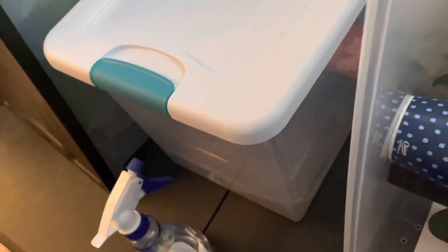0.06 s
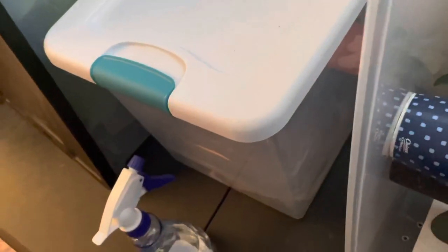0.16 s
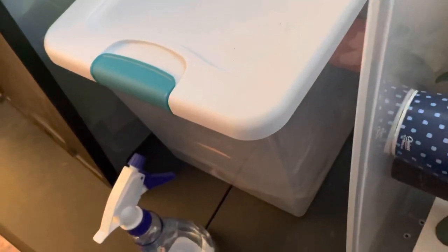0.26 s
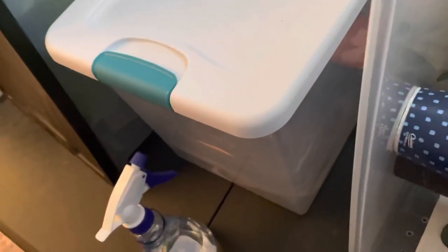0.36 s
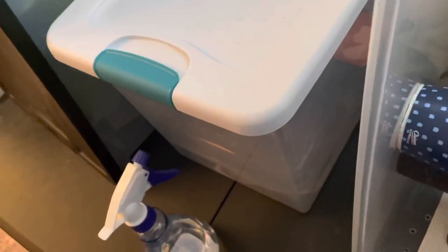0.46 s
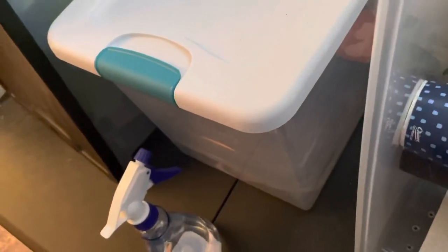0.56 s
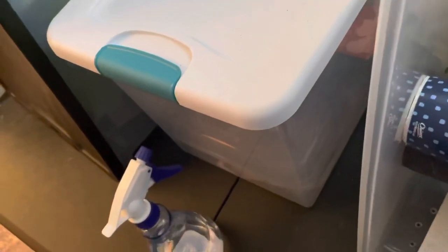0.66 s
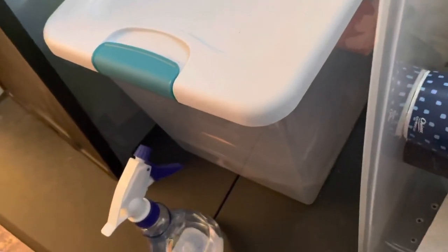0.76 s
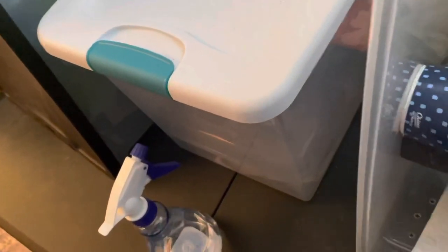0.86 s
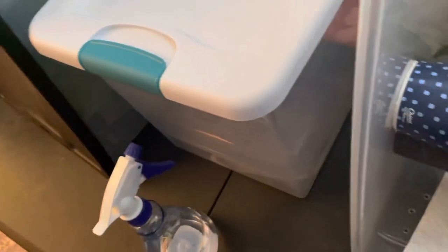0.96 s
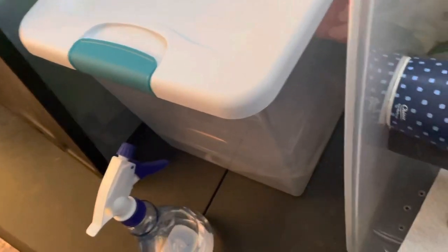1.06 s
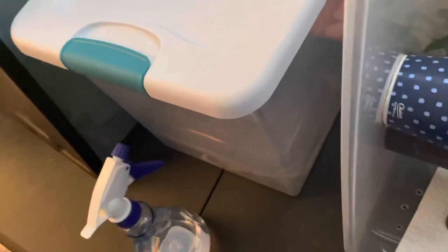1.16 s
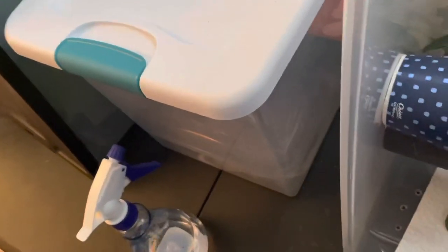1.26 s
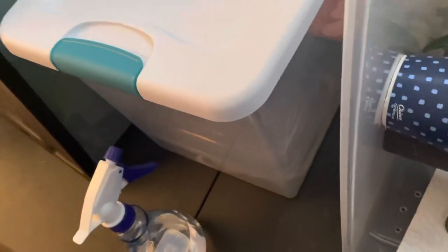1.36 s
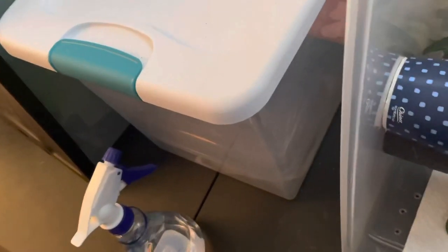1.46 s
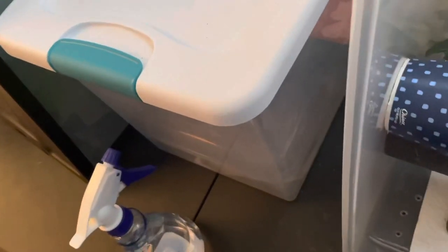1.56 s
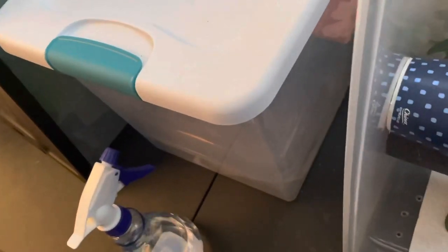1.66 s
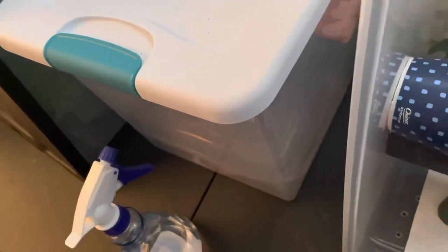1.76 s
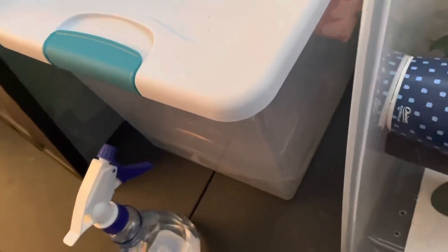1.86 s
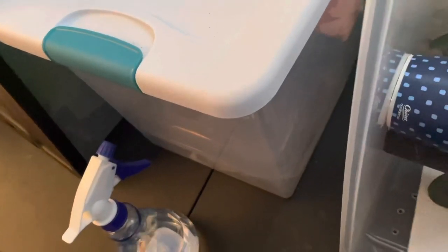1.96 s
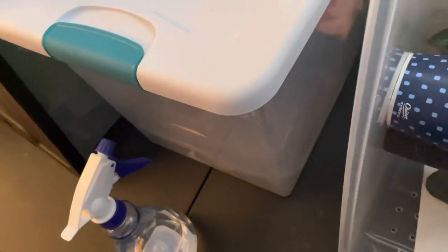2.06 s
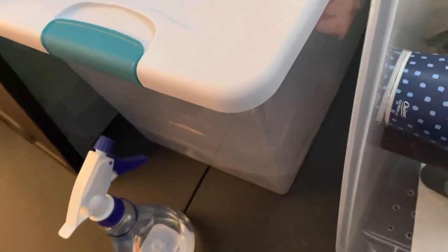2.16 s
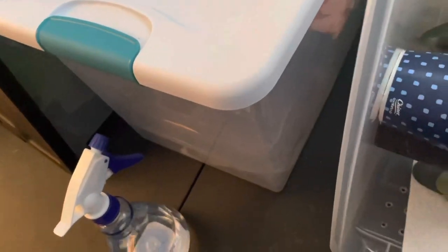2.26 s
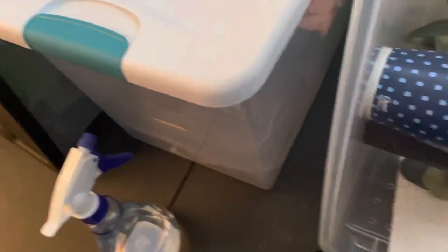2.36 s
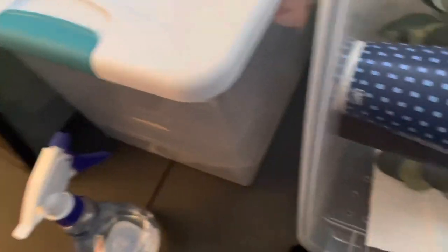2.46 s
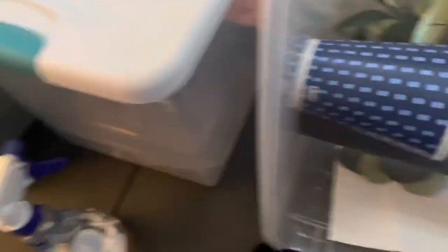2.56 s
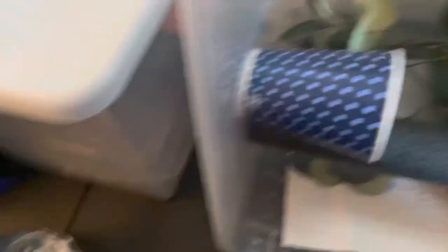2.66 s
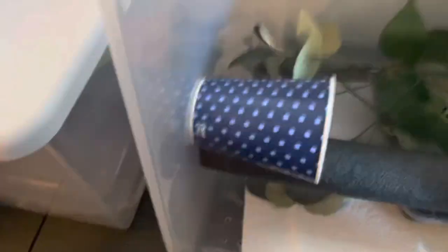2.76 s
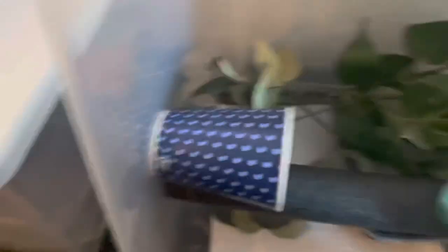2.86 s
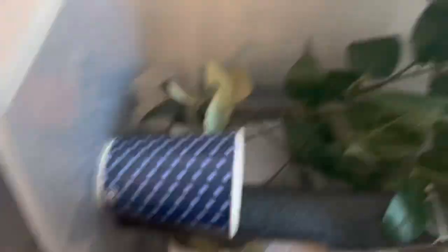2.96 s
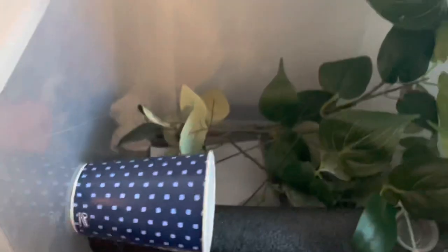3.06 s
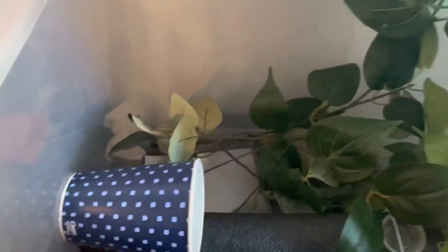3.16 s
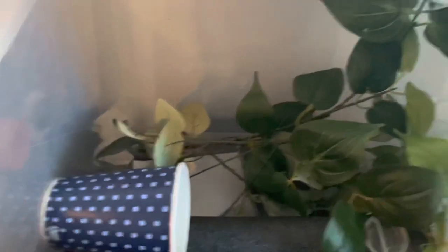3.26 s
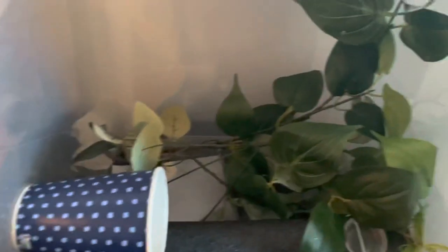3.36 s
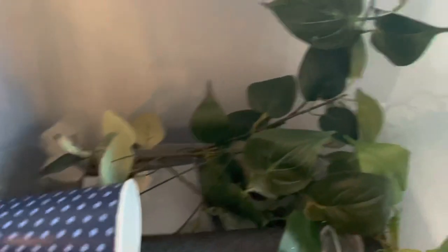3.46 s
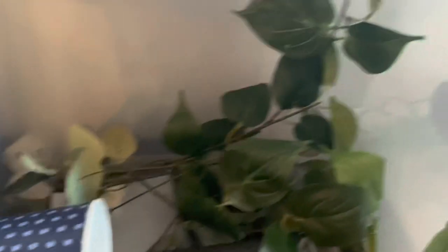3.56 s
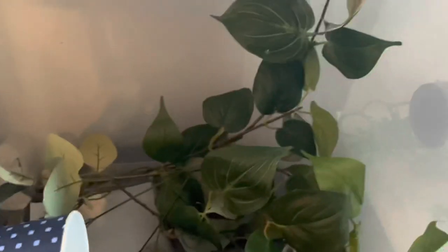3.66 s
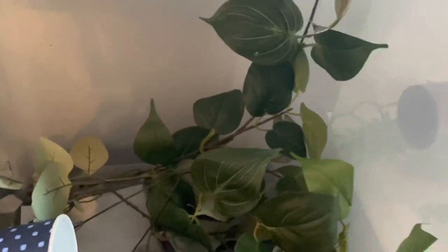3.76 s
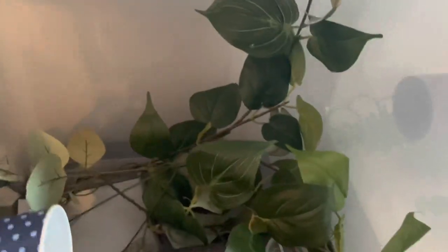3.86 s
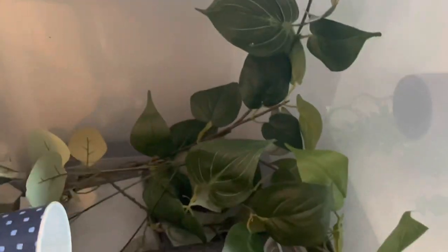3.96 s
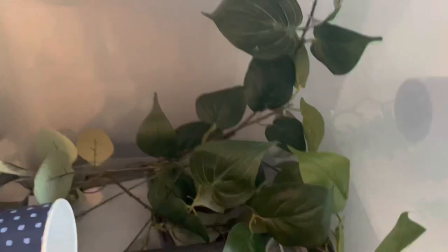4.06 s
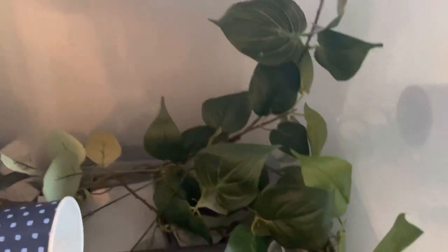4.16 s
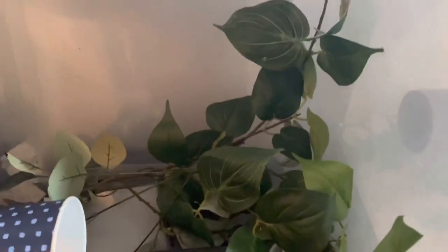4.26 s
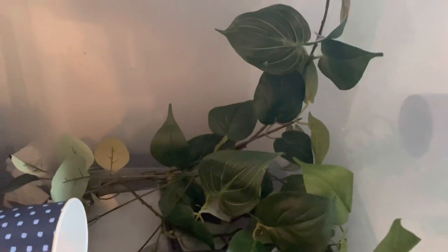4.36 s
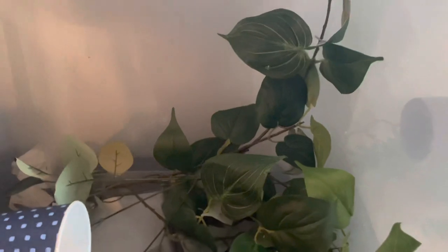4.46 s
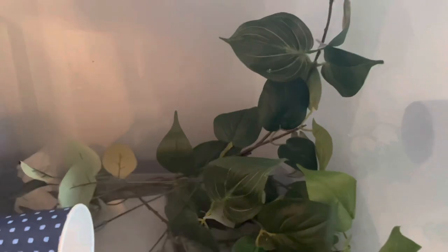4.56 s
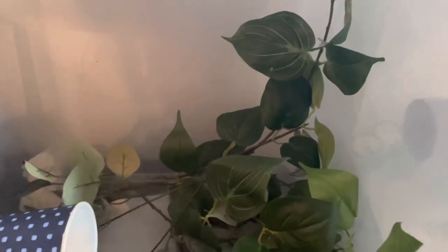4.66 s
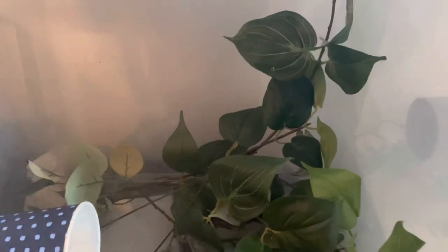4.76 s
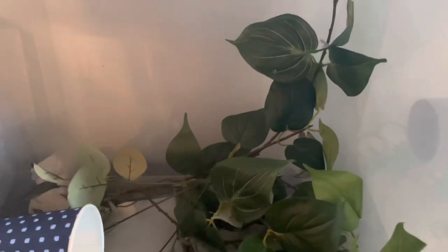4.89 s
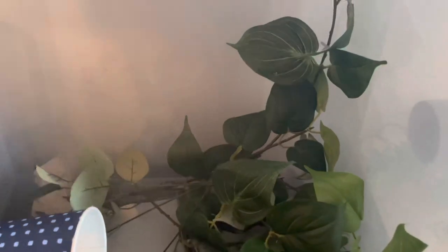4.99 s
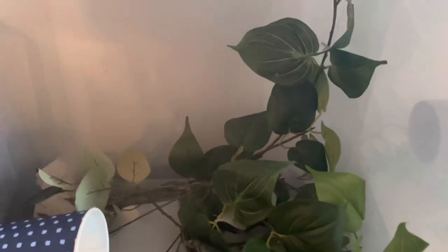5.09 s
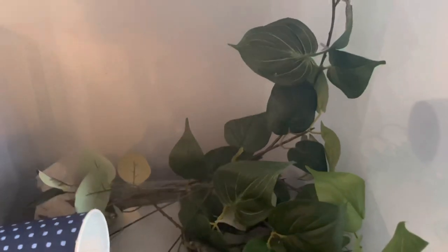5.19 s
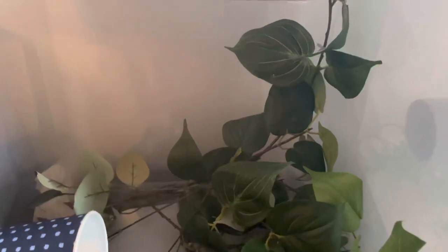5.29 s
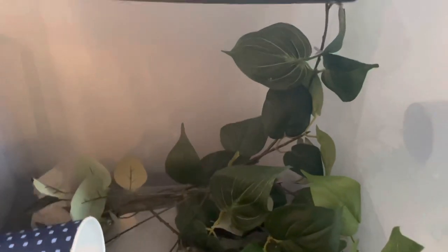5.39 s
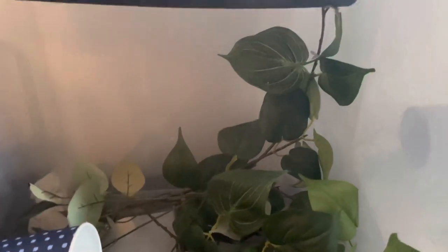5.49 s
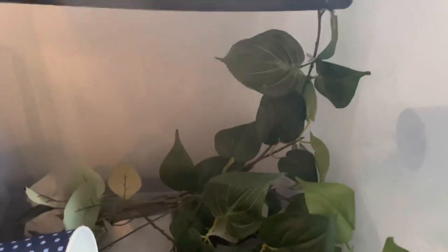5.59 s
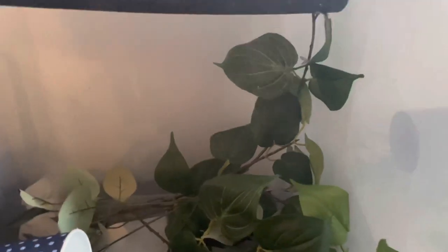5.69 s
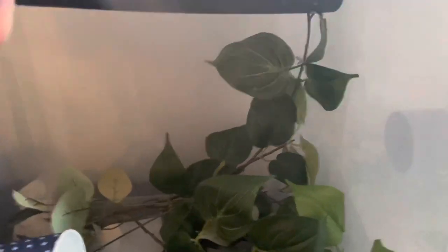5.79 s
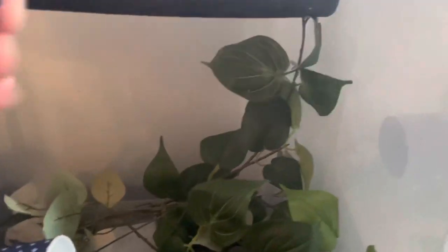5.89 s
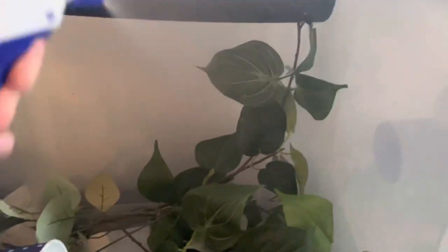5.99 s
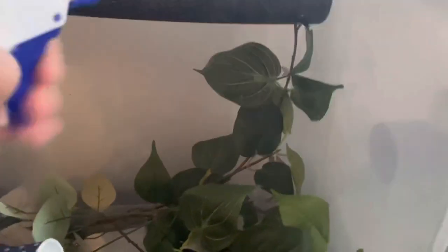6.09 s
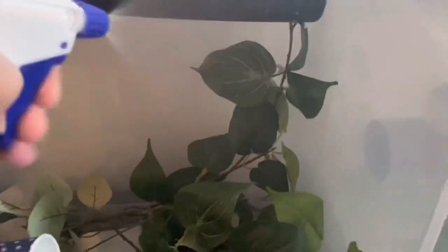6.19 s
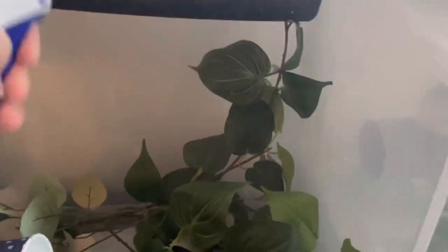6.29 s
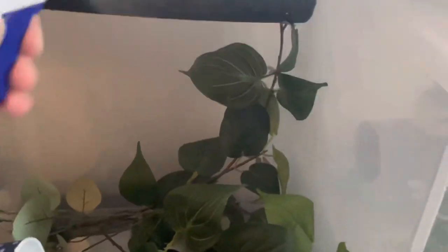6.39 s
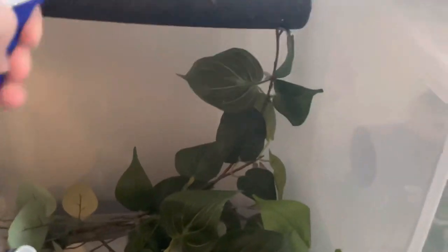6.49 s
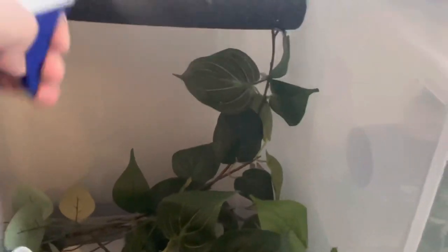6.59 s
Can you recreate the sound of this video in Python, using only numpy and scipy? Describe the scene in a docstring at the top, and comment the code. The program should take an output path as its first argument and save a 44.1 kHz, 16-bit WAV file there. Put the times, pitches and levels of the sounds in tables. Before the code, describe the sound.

A quiet indoor room with a soft low ventilation hum throughout, heard close in wide stereo. From 0 to 0.9 seconds sleeves rustle, with small plastic ticks, brighter clicks around 0.5 to 0.65, and a hollow knock with a dull low bump at about 0.75. Around 1.4 to 1.8 come two more light, higher knocks on the plastic tub, with short finger rubs and cloth swishes. Then it thins out, with faint brushing, small knocks and muffled bumps near 2.8, 3.1 and 3.5, and a tiny tick at 3.9. Trigger clicks at 4.35 begin eleven quick squirts, roughly every 0.2 seconds through 6.5. The first is softer, mostly mist; the rest are sharp spits swelling into bright, airy hiss about a tenth of a second long, cut off abruptly, each with a short sinking watery thud on plastic and a faint refill fizz. The spraying runs to the end.

```python
"""A trigger spray bottle mists a plant inside a plastic tub, in a quiet room with a low hum throughout.
First sleeves rustle (grainy noise), something bumps (low modes) and the tub is handled (ticks, knocks, rubs).
Then come eleven quick squeezes. In each the valve spits a sharp noise burst, the first water thuds on the tub
as sinking tones, the mist swells and stops as patchy hiss with a narrow jet, and the pump refills with a fizz.
"""
import sys
import numpy as np
from scipy import signal
from scipy.fft import rfft, irfft, next_fast_len
from scipy.io import wavfile
from scipy.ndimage import uniform_filter1d, map_coordinates

SR = 44100
rng = np.random.default_rng(int(sys.argv[2]) if len(sys.argv) > 2 else 0)


def master_out(mix):
    """Clip the mix to full scale and print it as 16-bit PCM to the path in sys.argv[1]."""
    frames = np.transpose(np.atleast_2d(mix))
    ceiling = np.clip(frames, -1, 1)
    pcm = np.round(ceiling * 32767).astype(np.int16)
    wavfile.write(sys.argv[1], SR, pcm)


N = 292451
T = np.arange(N) / SR
HALF_SECOND = T[:SR // 2]

# Event levels and source spectra are relative: trims, colouring and the room act on them afterwards.
# trigger squeezes: t/s, length/s, mist level/dB, jet f/Hz, fine spray over the rest/dB, spit level/dB,
# clack level/dB, clack f/Hz, splat level/dB, drum f/Hz, wall level/dB, wall f/Hz, refill level/dB
SQUEEZES = [(4.372, .15, -24, 3320, 0, -38, -41, 5900, -59, 400, -56, 1500, -47),
            (4.616, 0.12, -24, 3660, -2, -25.5, -35, 7050, -32.5, 225, -31.5, 990, -45.5),
            (4.841, 0.12, -23, 4050, 0.5, -21, -44, 4510, -27, 383, -29, 1000, -45.5),
            (5.065, 0.11, -23, 4960, -2.5, -19.5, -29, 6740, -29.5, 394, -35, 1130, -45),
            (5.287, 0.1, -20, 4720, -1, -21, -30, 4180, -24, 443, -30.5, 1940, -44),
            (5.502, .093, -20, 4130, 1.5, -18, -44, 4150, -24, 430, -28, 1560, -44.5),
            (5.71, 0.086, -21, 4290, 1, -15.5, -26.5, 6420, -22, 433, -26, 1590, -46),
            (5.9087, .071, -20.5, 4030, -1.5, -15, -28, 6390, -22, 398, -30, 1456, -50),
            (6.1115, 0.1, -20, 4490, 0, -19.5, -25, 4420, -28.5, 340, -35, 1440, -46.5),
            (6.333, 0.091, -22, 3885, 2.5, -22, -23, 4200, -24, 407, -27.5, 746, -45),
            (6.535, 0.093, -21.5, 4800, 1, -17.5, -34, 6000, -30, 450, -31.5, 800, -49)]
# small plastic ticks of bottle, trigger and tub: t/s, ring level/dB, ring f/Hz, crack level/dB
TICKS = [(.045, -44, 2660, -47), (.073, -47, 2960, -48), (.281, -43, 2470, -40), (0.293, -49, 4900, -44),
         (.529, -32, 4830, -31.5), (.602, -38, 4500, -42), (.611, -41, 4300, -45), (.647, -41, 4800, -38),
         (.812, -39.5, 1470, -44), (1.378, -49, 4400, -49), (1.497, -54, 3280, -47),
         (1.576, -47, 5200, -43), (2.37, -56, 4130, -62), (2.711, -54, 3190, -47), (2.837, -59, 3480, -44),
         (3.769, -57, 6400, -49), (3.9, -38.5, 3330, -61), (4.316, -47, 2560, -42.5),
         (4.35, -39, 7750, -36), (4.386, -37, 5000, -32), (4.549, -50, 2680, -33), (4.77, -45, 3240, -42),
         (5.213, -50, 4500, -39), (5.245, -52, 4000, -42), (5.469, -47, 4200, -37), (5.659, -48, 4520, -39),
         (5.695, -40, 6650, -45), (5.863, -41, 6300, -45), (6.039, -50, 4300, -46), (6.054, -46, 4300, -35),
         (6.285, -49, 5000, -36), (6.31, -42, 4500, -44)]
# light knocks on tub and bottle: t/s, level/dB, ring f/Hz
KNOCKS = [(.044, -29.5, 510), (.046, -41, 990), (.07, -35, 690), (.286, -38, 600), (.752, -23.5, 560),
          (.754, -26.5, 950), (1.419, -25.5, 1420), (1.425, -31, 900), (1.455, -40, 570),
          (1.756, -24.5, 1040), (1.766, -28, 870), (2.801, -30, 650), (2.838, -32, 640), (3.041, -38, 453),
          (3.08, -34, 1150), (3.083, -35, 680), (3.525, -33, 300), (3.565, -35, 271), (4.765, -36, 890),
          (4.797, -36, 1950), (5.66, -37, 1690), (5.827, -32.5, 1890), (5.834, -35, 1400), (6.05, -37, 746)]
# dull bumps: t/s, level/dB, f/Hz, t60/s
BUMPS = [(.66, -50, 180, .1), (0.762, -25, 102.5, 0.165), (.83, -43, 69.3, 0.43), (1.465, -47.5, 170, 0.19),
         (2.721, -35.5, 50.7, 0.26), (2.803, -50, 58, 0.18), (2.838, -37.5, 102, 0.041),
         (3.124, -45, 126, .1), (3.52, -46, 153, 0.16), (3.561, -49, 121, 0.26)]
# modes rung by each bump: f as a ratio to the bump's f, level/dB
BUMP_MODES = [(.58, -3.5), (1, 5), (1.42, -9)]
# modes of the wetted tub wall: f/Hz, level/dB
WALL_MODES = [(200, -15), (470, -12.5), (760, -20), (1020, -16), (1370, -5.5), (1800, -10)]
# narrow tub resonances that colour the mist: f/Hz, width/Hz, lift/dB
TUB_MODES = [(1470, 61, 3.5), (1856, 43, 4), (2660, 120, 3), (3200, 92, 2), (4100, 220, 4),
             (5000, 180, 3.5), (6280, 280, 3), (6900, 120, 3)]

# strokes, all with columns: t/s, length/s, level at mid-stroke/dB, swell over the stroke/dB
# sleeves swishing
SWISHES = [(0.0, 0.081, -48, 3), (.09, 0.44, -47, 8.5), (.535, 0.14, -41.7, -0.5),
           (.685, 0.091, -40.5, 4.5), (.78, .04, -51, -4), (1.0, 0.21, -58, 8), (1.375, 0.14, -49, -10),
           (1.62, 0.49, -47.5, 0.5), (1.668, 0.11, -43, -1), (2.09, 0.2, -60.5, -6),
           (2.27, 0.064, -50.5, -6), (2.65, .21, -56.5, 17), (2.952, .1, -62, -8), (3.595, .06, -55.5, -4),
           (3.76, 0.069, -54.5, -2), (3.92, 0.17, -62.5, 1)]
# fingers dragging on the tub
RUBS = [(1.375, 0.17, -46, -8), (1.413, 0.04, -33.5, -5), (1.67, 0.11, -39, 3.5)]
# the hand shifting its grip, a low rumble
GRIP_SHIFTS = [(.285, 0.03, -41, -2), (.65, 0.17, -43, 11), (1.9, 0.33, -55, -12), (2.725, 0.15, -46.5, 2),
               (3.525, 0.13, -45.5, -13), (3.85, 0.37, -51, 4)]
# a sleeve brushing softly past the tub, farther away
BRUSHES = [(2.47, 0.38, -55, 7), (2.952, 0.14, -54.5, -7), (3.07, 0.38, -60, -5), (3.92, 0.22, -56.5, 1)]

# noise colours, all with columns: f/Hz, density/dB per Hz
# the mist's hiss
MIST_COLOUR = [(50, -48), (150, -13), (450, -11), (750, -6), (1000, -10), (1450, -1.2), (2000, -4.2),
               (2700, -.3), (4100, 0), (5500, .2), (6600, 1.8), (9000, 0), (12000, -2.2), (14300, -.2),
               (15800, -1.5)]
# the valve's spit
SPIT_COLOUR = [(60, -52), (300, -4), (750, 1.5), (1500, 0), (4000, -0.5), (6500, 1.5), (9000, 10),
               (12000, 2), (14300, 6.5), (16000, 5)]
# the slap of the first water
SPLAT_COLOUR = [(40, -40), (130, 10.5), (300, -4), (750, 3), (1050, -2), (1600, 1), (3000, 0), (6000, -48),
                (12000, -45)]
# water drawn into the pump
REFILL_COLOUR = [(50, -50), (120, -11), (380, 10.5), (1000, 1), (2000, 4), (4500, -4), (7000, 3.5),
                 (11000, -0.5), (14300, 1.5), (16000, -27)]
# sleeve cloth, also the crack of the ticks
SLEEVE_COLOUR = [(300, -11), (2000, 4.5), (3500, 2), (5000, 4.5), (6500, 0.5), (9000, 4), (12000, -2),
                 (14500, -1), (16000, 0.5)]
# fingers on plastic
RUB_COLOUR = [(150, -26), (500, -5), (1000, -2.5), (1600, -4.5), (2600, -16), (5000, -20.5), (12000, -57)]
# the shifting grip
RUMBLE_COLOUR = [(25, -27), (60, 4.5), (150, -10), (350, -9), (700, -33), (2000, -60)]
# the distant sleeve brush
BRUSH_COLOUR = [(500, -8), (2000, 3), (4000, 4), (6500, -0.5), (9000, -2.5), (15000, -27)]
# the ventilation's murmur
AIR_COLOUR = [(20, -32), (35, -6), (58, -7), (80, -4), (110, -8.5), (150, -3.5), (240, -12.5), (380, -3.5),
              (650, -6), (1300, -15), (2000, -16.5), (2700, -21.5), (6500, -34.5), (10500, -42),
              (15500, -41)]

# low room modes: f/Hz, width/Hz, level/dB
HUM_MODES = [(61, 16, -55.5), (107, 20, -59)]
# stereo width: f/Hz, side minus mid/dB
WIDTH = [(60, -15), (300, -6), (700, 0.5), (2000, 0), (5600, -0.5), (6600, -4.5), (7600, 5), (9000, 19),
         (9900, 5), (11300, -1.5), (12300, -3.5), (13300, -46)]
# decay of the room: f/Hz, t60/s
ROOM_DECAY = [(150, 0.79), (1500, 1), (6000, 0.42), (15000, 0.39)]

FINE_HZ = 7000  # the finest droplets hiss above this pitch
CLOSING_S, CLOSING_GROWS = 0.0059, 2.09  # cut-off time of a 0.1 s squeeze, exponent of its growth with length
STROKE_RISE_S, STROKE_FALL_S = 0.017, 0.016  # a hand gets moving, and comes to rest
GENTLE_DB, GENTLE_SLOWS = -43.5, 0.51  # strokes softer than this start and end more gradually, louder ones faster
REST_SLEEVE_DB, REST_RUB_DB, REST_GRIP_DB = -67, -58, -56.5  # a hand is never quite still
REST_BRUSH_DB = -74.5
SLEEVE_RUB_DB = -5.5  # a moving sleeve also brushes the tub
BRIGHT_AT_DB, BRIGHT_HZ = -55, 8500  # a sleeve softer than this level loses its treble above this pitch
AIR_DB, AIR_DRIFT_DB = -48, 0.9
TOP_HZ = 15800


def mist(rise=0.5, start=0.2583, droop_db=2.0, flutter_db=2.0, surge_db=1.64, drops=0.46,
         jet_db=-14, jet_width_hz=1000, jet_bend=.25):
    """Nozzle pressure builds, sags late and collapses as the piston bottoms; the jet's pitch follows."""
    flow, fine, jet, t = np.zeros(N), np.zeros(N), np.zeros((2, N)), HALF_SECOND
    for s, length, db, jet_hz, fine_db, *_ in SQUEEZES:
        # rise is a fraction of the squeeze, start a fraction of full pressure
        progress = np.minimum(t / (rise * length), 1)
        build = start + (1 - start) * np.sin(progress * np.pi / 2) ** 2
        sag = amp(-droop_db * np.clip(2 * t / length - 1, 0, 2) ** 2)
        closing = CLOSING_S * (10 * length) ** CLOSING_GROWS
        shut = .5 - .5 * np.tanh((t - length) / (2 * closing))
        pressure = build * sag * shut
        add(flow, s, amp(db) * pressure)
        add(fine, s, amp(db + fine_db) * pressure)
        jet_pitch = jet_hz * (1 - jet_bend * (1 - pressure))
        add(jet, s, amp(db + jet_db) * pressure * band(jet_pitch, jet_width_hz))
    hiss = patchy(noise(MIST_COLOUR), depth_db=2.35)
    # coarser droplets patter on leaves and wall
    hiss = hiss + drops * grains(MIST_COLOUR, rate=3000)
    hiss = unit(filtered(hiss, tub_colour))
    coarse = filtered(hiss, lambda hz: treble_cut(hz, FINE_HZ))
    unsteady = amp(flutter_db * wobble(160) + surge_db * wobble(40))
    return unsteady * (flow * coarse + fine * (hiss - coarse) + jet)


def tub_colour(hz):
    """The tub's narrow resonances lift the mist around their own pitches."""
    return amp(sum(lift / (1 + (2 * (hz - f) / width) ** 2) for f, width, lift in TUB_MODES))


def spits(lead=0.0053, leak_db=-26.5, spatter=0.71):
    """The valve leaks for an instant, then bursts open with a sharp spit and a plastic clack."""
    burst, clack = np.zeros(N), np.zeros((2, N))
    for s, _, _, _, _, db, clack_db, clack_hz, *_ in SQUEEZES:
        add(burst, s - lead, amp(leak_db) * fade(0.0025, 0.041))
        add(burst, s, amp(db) * (fade(0.0004, 0.0036) + spatter * fade(0.0018, 0.026)))
        plastic = band(np.full(SR // 2, clack_hz), width_hz=790)
        add(clack, s, amp(clack_db) * fade(.003, 0.027) * plastic)
    return burst * noise(SPIT_COLOUR) + clack


def splats(flight=0.00421, drum_lag=.0012, slap_db=-2.5, drum_db=-5, wall_t60=0.045, struck_t60=0.036,
           lowest_hz=150, sink=.42, sink_s=0.021):
    """First coarse water drums on the wall, sinking in pitch as it spreads; the spot hit sets a higher mode."""
    slap, drum, t = np.zeros(N), np.zeros((2, N)), HALF_SECOND
    glide = np.cumsum(1 - sink * (1 - np.exp(-t / sink_s))) / SR
    for s, *_, db, hz, wall_db, wall_hz, _ in SQUEEZES:
        hit = s + flight
        add(slap, hit, amp(db + slap_db) * fade(0.0013, 0.093))
        thud = np.sin(2 * np.pi * hz * glide) * [[1.8], [.9]]
        add(drum, hit + drum_lag, amp(db + drum_db) * fade(0.0013, 0.038) * thud)
        struck = np.sin(2 * np.pi * wall_hz * t) * [[1.4], [.6]]
        add(drum, hit, amp(wall_db) * fade(0.0005, struck_t60) * struck)
        # each hit excites the wall modes in a random balance
        modes = sum(amp(level) * rng.standard_normal((2, 1)) * np.sin(2 * np.pi * f * t)
                    for f, level in WALL_MODES)
        add(drum, hit, amp(db) * fade(0.0015, wall_t60) * modes)
    highpass = signal.butter(2, lowest_hz, "high", fs=SR)
    return signal.lfilter(*highpass, slap * patchy(noise(SPLAT_COLOUR), depth_db=3.0) + drum)


def refills(grain_db=3, level_db=2.0, bubbles=0.67):
    """The trigger springs back and water fizzes and crackles into the pump, dying away."""
    suck = np.zeros(N)
    for s, length, *_, db in SQUEEZES:
        add(suck, s + length, amp(db) * fade(.05, .36))
    water = patchy(noise(REFILL_COLOUR), depth_db=3.5)
    fizz = unit(water + bubbles * grains(REFILL_COLOUR, rate=230))
    return amp(level_db + grain_db * wobble(90)) * suck * fizz


def tub(spray, t60=0.043):
    """The tub's close walls answer differently as the nozzle is re-aimed for each squeeze."""
    out = np.zeros((2, N))
    starts = [row[0] - .01 for row in SQUEEZES]
    squirts = np.split(spray, [round(s * SR) for s in starts], axis=1)[1:]
    for s, squirt in zip(starts, squirts):
        add(out, s, echo(squirt, [(1000, t60)]))
    return out


def handling(grain_db=1.53, catch=0.47, uneven_db=1.1, snag=0.15, stick=0.36):
    """Cloth and fingers slide in tiny slips, cloth brighter when louder, until the hand settles on the trigger."""
    swish = strokes(SWISHES, REST_SLEEVE_DB)
    rub = np.hypot(strokes(RUBS, REST_RUB_DB), amp(SLEEVE_RUB_DB) * swish)
    cloth = patchy(noise(SLEEVE_COLOUR), depth_db=4.0)
    catches = catch * grains(SLEEVE_COLOUR, rate=1000)
    snags = snag * grains(SLEEVE_COLOUR, rate=99)
    cloth = unit(cloth + catches + snags)
    dull = filtered(cloth, lambda hz: treble_cut(hz, BRIGHT_HZ))
    brightness = swish / np.hypot(swish, amp(BRIGHT_AT_DB))
    cloth = dull + (cloth - dull) * brightness
    scuff = unit(patchy(noise(RUB_COLOUR), depth_db=3.5) + stick * grains(RUB_COLOUR, rate=450))
    unevenness = amp(grain_db * wobble(220) + uneven_db * wobble(30))
    sliding = unevenness * (swish * cloth + rub * scuff)
    brushing = strokes(BRUSHES, REST_BRUSH_DB) * patchy(noise(BRUSH_COLOUR), depth_db=3.5)
    rumble = strokes(GRIP_SHIFTS, REST_GRIP_DB) * noise(RUMBLE_COLOUR)
    settling = np.interp(T, [4.3, 4.4], [1, 0])
    return (sliding + brushing + rumble) * settling


def strokes(rows, rest_db):
    """Level of a sliding hand: each stroke rises, swells or wanes evenly, and dies away."""
    power = np.full(N, amp(rest_db) ** 2)
    for s, length, db, swell_db in rows:
        ease = amp(GENTLE_SLOWS * (GENTLE_DB - db))
        rise = 1 + np.tanh((T - s) / (ease * STROKE_RISE_S))
        fall = 1 - np.tanh((T - s - length) / (ease * STROKE_FALL_S))
        swell = swell_db * (np.clip((T - s) / length, 0, 1) - .5)
        power += (rise * fall / 4 * amp(db + swell)) ** 2
    return np.sqrt(power)


def contacts(knock_db=-3):
    """Hard plastic ticks briefly with a ring and a crack; the tub's wall knocks lower."""
    out, crack = np.zeros((2, N)), np.zeros(N)
    for s, db, hz, crack_db in TICKS:
        add(out, s, amp(db) * fade(0.00031, 0.06) * ring(hz, width=0.052))
        add(crack, s, amp(crack_db) * fade(0.00016, 0.076))
    wall = np.zeros((2, N))
    for s, db, hz in KNOCKS:
        add(wall, s, amp(db + knock_db) * fade(0.00073, 0.044) * ring(hz, width=0.12))
    soft_wall = filtered(wall, lambda hz: 1 / np.hypot(1, (hz / 2200) ** 2))
    return out + crack * noise(SLEEVE_COLOUR) + soft_wall


def bumps(side_phase=-2.2):
    """Soft heavy contacts set a few low modes swinging, out of step between mid and side."""
    out = np.zeros((2, N))
    phase = [[0], [side_phase]]  # rad, for the mid and side fields
    for s, db, hz, t60 in BUMPS:
        modes = sum(amp(level) * np.sin(2 * np.pi * hz * ratio * HALF_SECOND + phase)
                    for ratio, level in BUMP_MODES)
        add(out, s, amp(db) * fade(0.0058, t60) * modes)
    return out * [[.8], [1.05]]


def background():
    """Ventilation murmurs as drifting noise and keeps two low room modes humming unevenly."""
    hum = 0
    for centre, width, db in HUM_MODES:
        mode = lambda hz: 1 / (1 + ((hz - centre) / width) ** 2) ** 2
        hum = hum + amp(db) * unit(filtered(rng.standard_normal(N), mode))
    murmur = amp(AIR_DB + AIR_DRIFT_DB * wobble(4)) * patchy(noise(AIR_COLOUR), depth_db=2)
    return murmur + hum * [[.9], [-1.1]]


def echo(x, t60s):
    """A diffuse answer, a noise tail whose frequencies each die at their own speed."""
    hz, t, z = signal.stft(rng.standard_normal((2, SR // 2)), SR, nperseg=128)
    decay = amp(-60 * t / along(t60s, hz)[:, None])
    tail = signal.istft(z * decay, SR, nperseg=128)[1]
    return signal.fftconvolve(x, tail / np.linalg.norm(tail[0]), axes=1)[:, :N]


def left_right(pair):
    """Mid and side fields become left and right, their balance set by frequency."""
    turn = lambda hz: np.arctan(amp(along(WIDTH, hz)))
    mid, side = filtered(pair, lambda hz: np.array([np.cos(turn(hz)), np.sin(turn(hz))]))
    return np.array([mid + side, mid - side])


def amp(db):
    """Decibels to gain."""
    return 10 ** (np.asarray(db) / 20)


def unit(x):
    """x at rms 1."""
    return x / np.sqrt(np.mean(x ** 2) + 1e-20)


def along(points, hz):
    """(f/Hz, value) points read on a log frequency axis."""
    f, v = np.transpose(points)
    return np.interp(np.log(hz + 1), np.log(f), v)


def wobble(rate):
    """A smooth random curve, rate knots a second."""
    knots = rng.standard_normal(int(N * rate / SR) + 4)
    return map_coordinates(knots, [T * rate / SR])


def filtered(x, response):
    """x shaped by a gain that depends on frequency."""
    m = next_fast_len(N + SR // 4)
    return irfft(rfft(x, m) * response(np.fft.rfftfreq(m, 1 / SR)), m)[..., :N]


def treble_cut(hz, corner_hz):
    """Gain of a smooth, steep roll-off above the corner."""
    return 1 / np.hypot(1, (hz / corner_hz) ** 4)


def noise(spectrum):
    """Two unrelated noises of one colour, rms 1."""
    return unit(filtered(rng.standard_normal((2, N)), lambda hz: amp(along(spectrum, hz))))


def patchy(x, depth_db, size=6):
    """Bright patches come and go across frequency as turbulence and reflections shift."""
    z = signal.stft(x, nperseg=512)[2]
    field = uniform_filter1d(rng.standard_normal(z.shape), 3, 1)
    field = uniform_filter1d(field, size, 2)
    return unit(signal.istft(z * amp(depth_db * unit(field)), nperseg=512)[1][:, :N])


def grains(spectrum, rate):
    """A crackle of tiny separate contacts, about rate a second, rms 1."""
    hits = (rng.random(N) < rate / SR) * rng.uniform(-0.89, 1, (2, N))
    return unit(filtered(hits, lambda hz: amp(along(spectrum, hz))))


def band(hz, width_hz):
    """Narrow noise whose centre follows hz, rms 1."""
    lowpass = signal.butter(2, width_hz / 2, fs=SR)
    a, b = signal.lfilter(*lowpass, rng.standard_normal((2, 2, len(hz))))
    phase = 2 * np.pi * np.cumsum(hz) / SR
    return unit(a * np.cos(phase) + b * np.sin(phase))


def ring(hz, width):
    """Half a second of closely packed modes around one pitch, rms 1; width is a fraction of hz."""
    b, a = signal.iirpeak(hz, max(1 / width, 1), SR)
    return unit(signal.lfilter(b, a, rng.standard_normal((2, SR // 2))))


def fade(attack, t60):
    """Half a second of a blow's envelope, peak 1; attack and t60 in seconds."""
    shape = (1 - np.exp(-HALF_SECOND / attack)) * amp(-60 * HALF_SECOND / t60)
    return shape / shape.max()


def add(track, s, sound):
    """Mix a short sound in at time s."""
    part = track[..., max(0, round(s * SR)):][..., :sound.shape[-1]]
    part += sound[..., :part.shape[-1]]


def scene(mist_db=.8, tub_db=-6, room_db=-15.5):
    """The tub's close walls colour the spray; the room answers spray, splats, contacts and bumps."""
    spray = amp(mist_db) * mist() + spits() + refills()
    near = spray + amp(tub_db) * tub(spray) + splats() + contacts() + bumps()
    room = amp(room_db) * echo(near, ROOM_DECAY)
    return left_right(near + room + handling() + background())


def record(dry, lowest_hz=38):
    """The deepest rumble is rolled off and nothing is kept above the band limit."""
    top = lambda hz: np.clip((TOP_HZ - hz) / 400 + .5, 0, 1)
    return filtered(dry, lambda hz: top(hz) * (1 - np.exp(-(hz / lowest_hz) ** 4)))


dry = scene()
out = record(dry)
master_out(out)
```